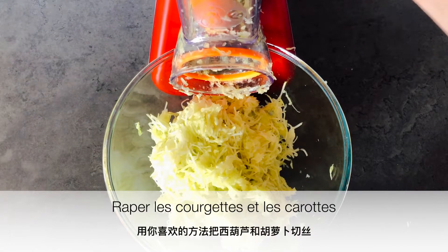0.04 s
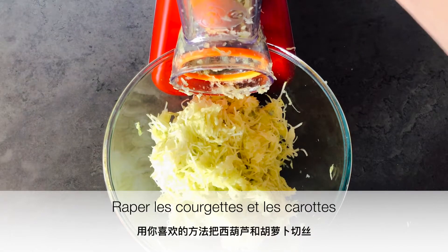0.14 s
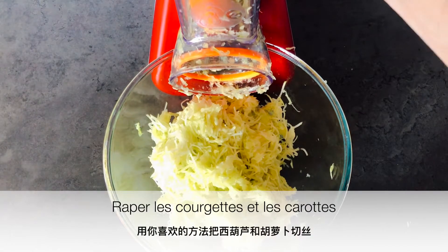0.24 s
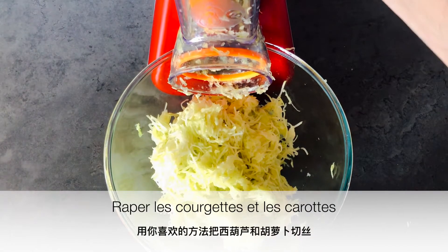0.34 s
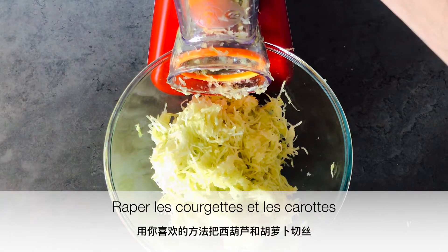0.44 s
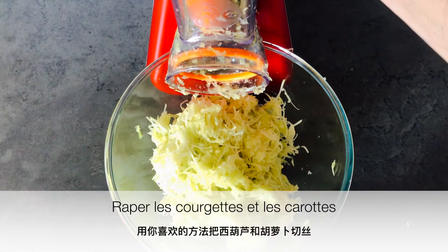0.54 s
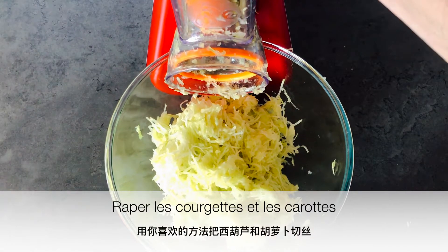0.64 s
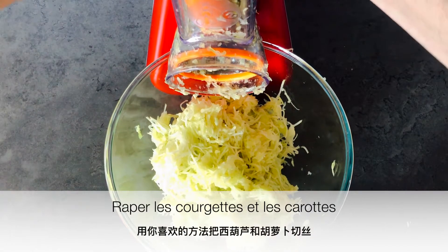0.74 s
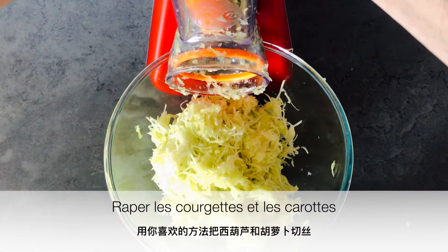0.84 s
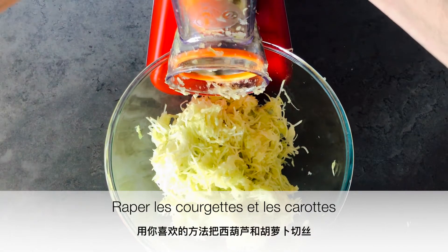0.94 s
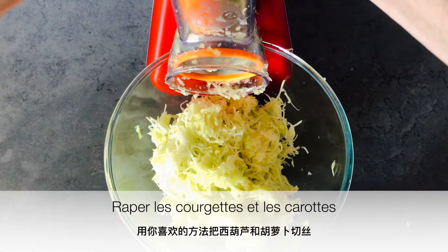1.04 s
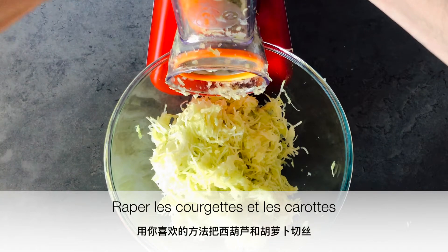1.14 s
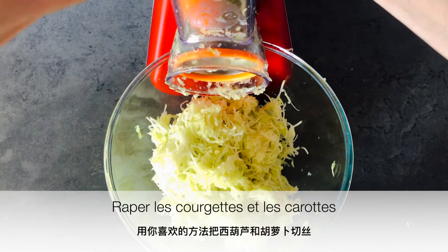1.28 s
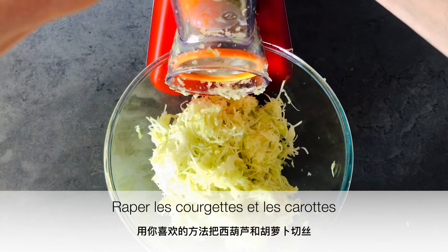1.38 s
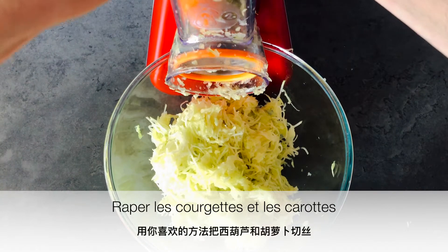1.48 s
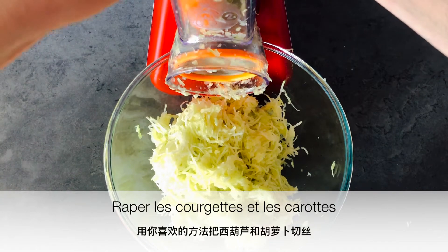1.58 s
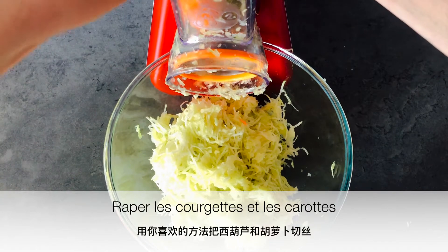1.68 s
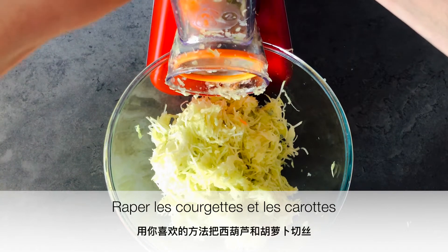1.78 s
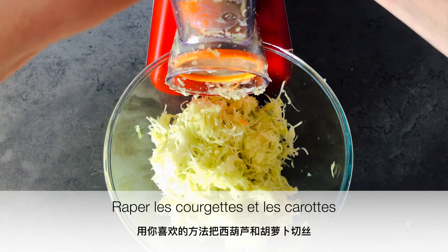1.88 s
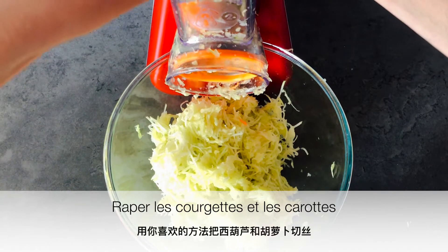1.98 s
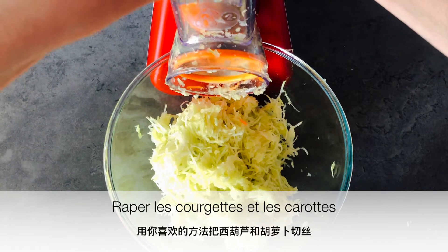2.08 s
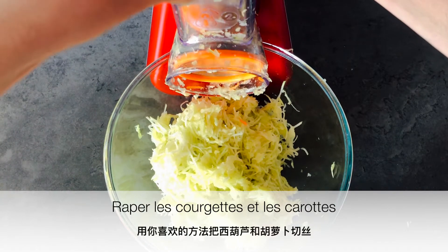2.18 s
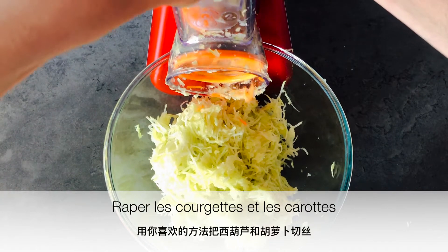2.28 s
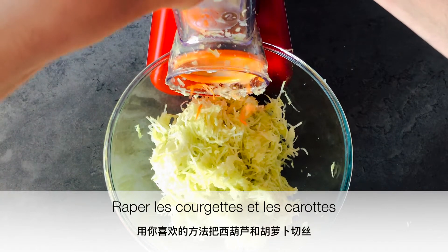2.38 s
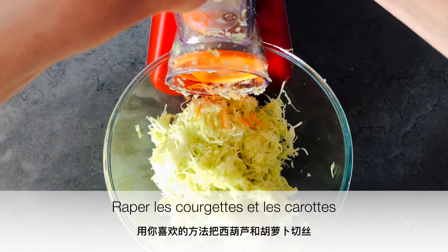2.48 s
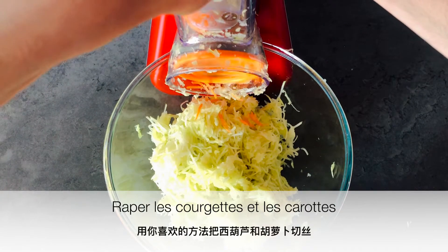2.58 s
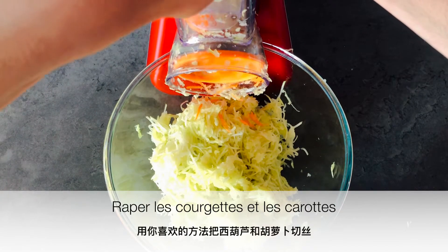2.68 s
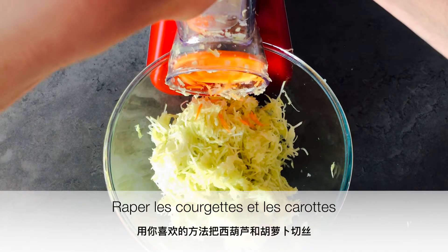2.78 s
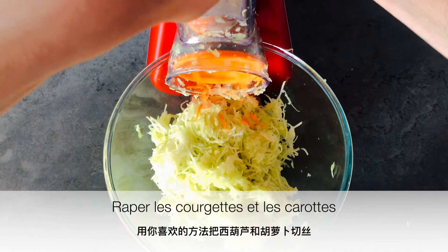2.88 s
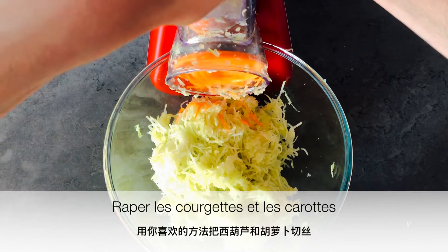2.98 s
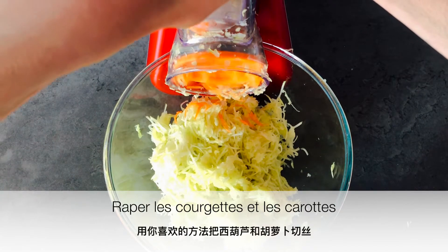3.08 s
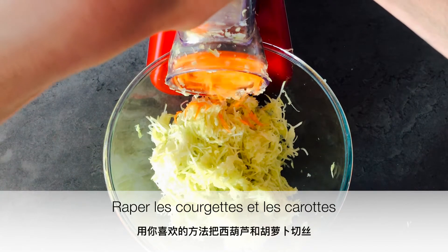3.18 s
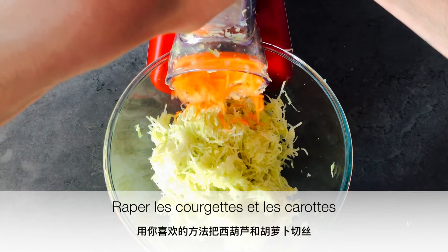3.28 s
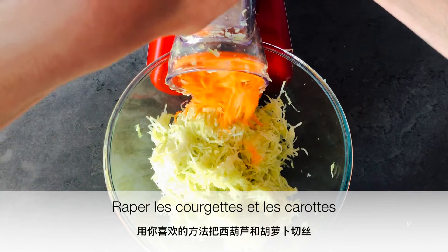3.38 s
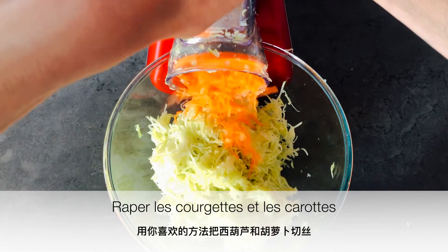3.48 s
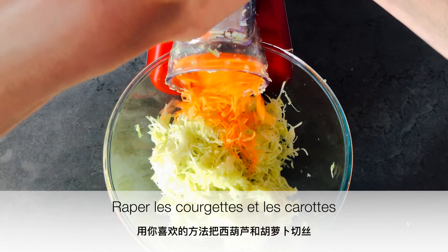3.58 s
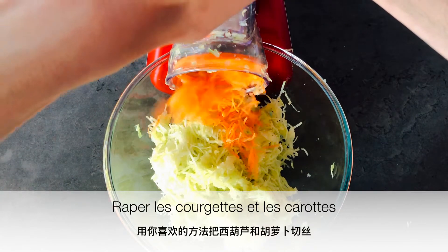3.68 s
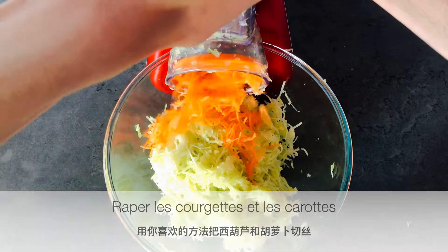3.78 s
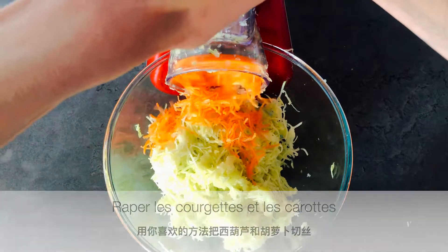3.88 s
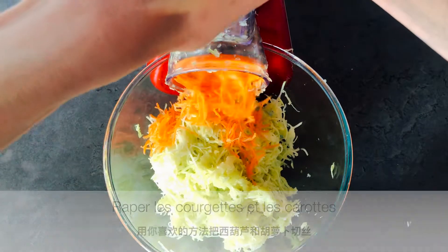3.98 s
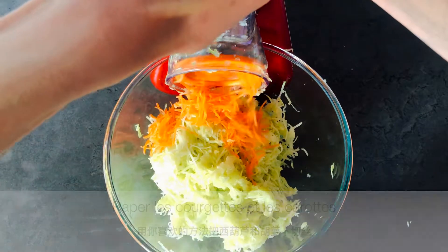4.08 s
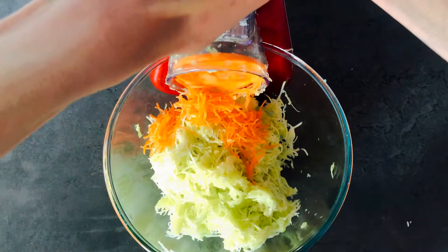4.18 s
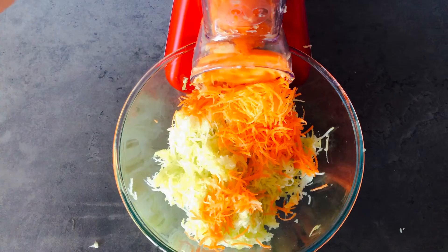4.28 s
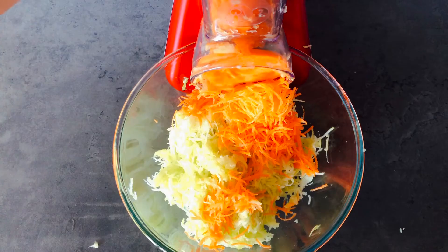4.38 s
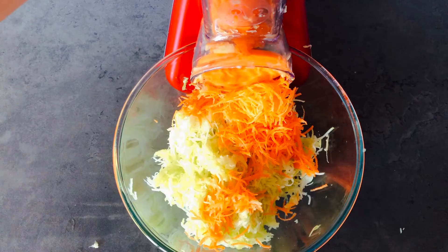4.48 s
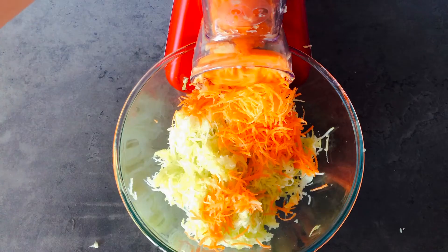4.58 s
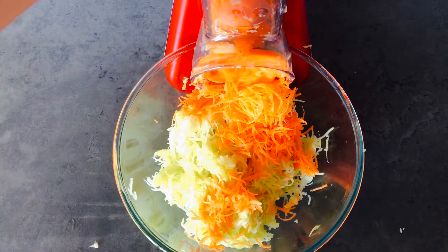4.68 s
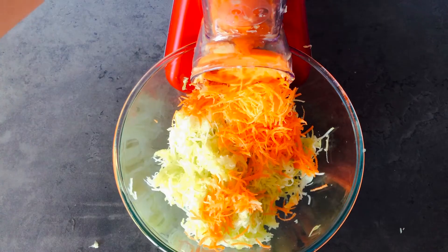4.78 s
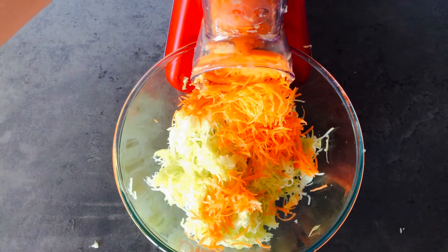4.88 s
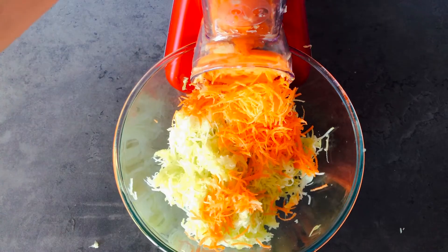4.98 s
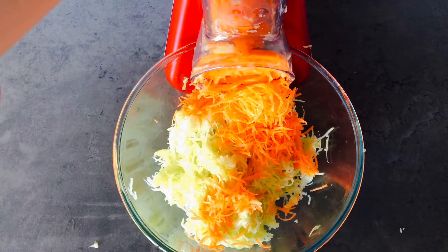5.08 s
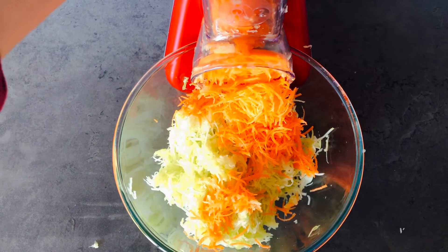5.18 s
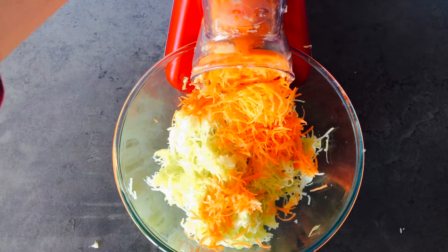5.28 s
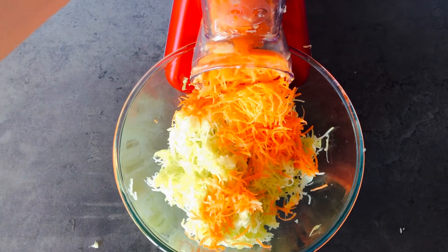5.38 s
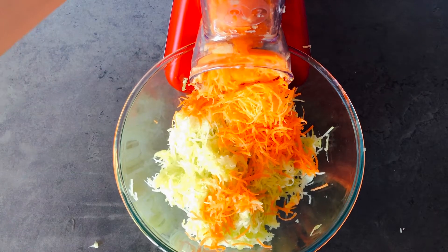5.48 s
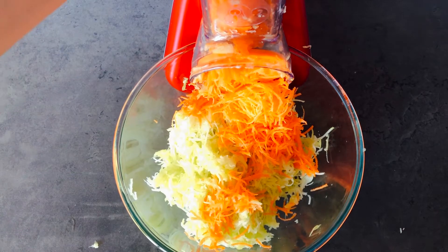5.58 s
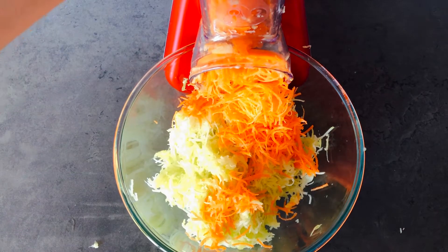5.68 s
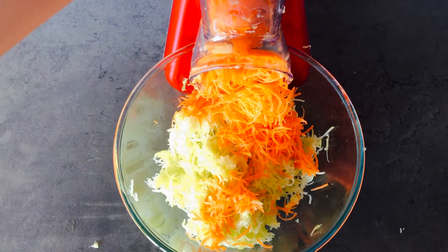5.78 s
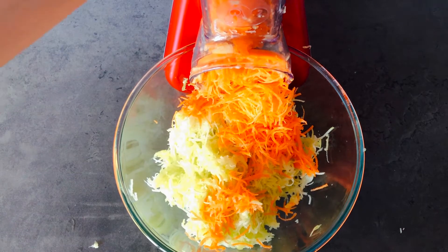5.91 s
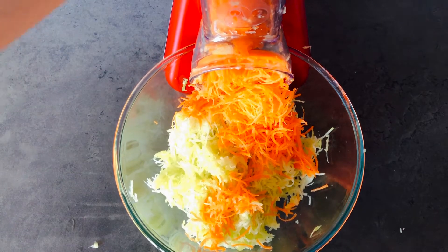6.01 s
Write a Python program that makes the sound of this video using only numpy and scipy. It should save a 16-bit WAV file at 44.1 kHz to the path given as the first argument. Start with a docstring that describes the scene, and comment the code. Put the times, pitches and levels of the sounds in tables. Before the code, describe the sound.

Close in a quiet kitchen, plastic clacks lead to a geared motor's rising whine, a rushing, slightly straining run, and a low winding-down glide.

```python
"""In a quiet kitchen, close by and the same in both channels, hands handle a small geared electric grater.
Knocks on the plastic casing are noise bursts and ringing modes; rubbing fingers are patchy shaped noise.
The motor whines up to speed and sags as it shreds: tones locked to three shafts, over rush, hiss and rumble.
At 4.229 s the powered sound breaks off and a lower, unloaded coast glides to a stop, hum under noise and rasp.
More knocks come during and after the coast; knocks and coast leave a short room echo."""
import sys
import numpy as np
from scipy import signal
from scipy.io import wavfile
from scipy.ndimage import uniform_filter1d

SR = 44100
rng = np.random.default_rng(int(sys.argv[2]) if len(sys.argv) > 2 else 0)


def digitize_waveform(pressure):
    """Quantize a signal to 16-bit integers and store it at the path in sys.argv[1].

    Rows of a 2-D input are taken as channels; values are limited to [-1, 1].
    """
    field = np.atleast_2d(pressure).T
    bounded = np.clip(field, -1, 1)
    quanta = np.round(bounded * 32767).astype(np.int16)
    wavfile.write(sys.argv[1], SR, quanta)


N = 266800

# Room tone spectrum: (frequency [Hz], density [dB per Hz])
ROOM_TONE_SHAPE = [(18, -70), (30, -28), (48, -7.5), (108, -3.5), (124, -8), (188, -3.5), (220, -7.5),
                   (258, -6), (318, -23), (413, -20), (755, -31), (1570, -38.5), (15800, -55.5)]
# Echo decay of the kitchen: (frequency [Hz], t60 [s])
ECHO_DECAY = [(200, 0.2), (600, 0.61), (1400, 0.75), (3700, 0.35), (10000, 0.28)]
# Fingers rubbing the casing, one list per rub: (time [s], level [dB])
RUBS = [
    [(0.35, -95), (0.4, -90), (0.544, -77), (0.834, -90), (0.9, -79)],
    [(5.88, -95), (5.944, -89), (6.05, -77)],
]
# Spectrum of the rubbing: (frequency [Hz], density [dB per Hz])
RUB_SHAPE = [(200, -38), (500, 12), (1500, 0), (4000, -13), (9000, -20), (15000, -40)]
# Knocks: (time [s], tick [dB], hollow thud [dB], clack [dB], thud centre [Hz], thud build-up [s], ring share [1])
KNOCKS = [(0.3541, -51, -41.5, -42, 394, .005, 0.88), (0.377, -44.5, -41.5, -46, 397, .007, 0.86),
          (0.472, -74, -50, -52.5, 706, 0.0042, 0.35), (0.478, -77, -43.5, -63, 665, 0.0025, 0.3),
          (0.537, -58.5, -62, -75, 210, .0021, 0.25), (0.678, -60, -73.5, -78, 202, .0021, 0.3),
          (0.6853, -68, -61, -52.5, 797, 0.0017, 0.05), (0.6956, -73, -45, -77.5, 362, 0.0017, 0.3),
          (0.773, -68, -77, -63, 606, 0.0019, 0.3), (0.783, -56.5, -50.5, -52.5, 355, 0.0016, 0.26),
          (0.8113, -68, -57, -61.5, 285, 0.0028, 0.2), (0.833, -67, -69.5, -69.5, 202, .0021, 0.3),
          (0.866, -83, -49.5, -72, 363, 0.0027, 0.3), (0.8984, -48, -44, -52, 322, .0021, 0.4),
          (0.9566, -40, -57, -38, 245, .0021, 0.2), (5.01, -50, -49, -40.5, 360, .0021, 0.2),
          (5.0172, -63, -42, -49.5, 393, 0.0038, 0.28), (5.401, -67.5, -67, -72.5, 205, 0.0019, 0.3),
          (5.54, -83, -68, -82, 328, .0021, 0.1), (5.6473, -87, -55.5, -91, 231, .0021, 0.3),
          (5.897, -88, -59.5, -63, 202, 0.0018, 0.21), (5.9306, -74, -48.5, -59.5, 266, 0.0031, 0.2),
          (5.9734, -79, -37.5, -51.5, 370, 0.0017, 0.22)]
# Hollow casing modes of the thud: (frequency [Hz], level [dB], t60 [s])
THUD_MODES = [(197, 0.5, 0.046), (271, -7, 0.054), (341, 0, 0.05), (365, -0.5, 0.055), (461, -5.5, 0.042),
              (621, -6.5, 0.045), (677, -2.5, 0.027), (862, -1, 0.017)]
# Short ring inside the clack: (frequency [Hz], level [dB], t60 [s])
RING_MODES = [(1290, -6, 0.035), (1640, -5, 0.038), (2220, -17, .025), (2600, -2, .055), (4050, 1.5, 0.026)]
# Casing resonances that lift noise and tones: (frequency [Hz], width [Hz], lift [dB])
CASING = [(193, 19, 6.5), (348, 16, 5.5), (369.5, 120, 7), (626, 58, 6.5), (720, 23, -2.5), (1216, 170, 5),
          (1534, 58, 4), (1736, 150, 6), (1872, 49, 5.5), (2094, 100, 4), (2237, 38, 3), (2602, 34, 3),
          (3490, 95, 2.5), (3745, 30, 7), (4256, 61, 3), (4740, 210, 5), (4960, 140, 1), (5350, 80, 2.5),
          (5750, 74, -0.5), (6470, 63, 1.5), (7395, 170, 5.5), (7810, 200, -3.5), (8160, 270, 5.5),
          (8900, 250, 3), (9900, 110, 1), (11640, 140, 3.5)]
# Turns per rotor turn: (rotor [1], middle shaft [1], third shaft [1])
SHAFTS = (1, 7 / 18, 7 / 18 * 13 / 40)
# The tone tables add up multiples of the three shaft speeds:
# (rotor multiple [1], middle shaft multiple [1], third shaft multiple [1], level [dB])
ROTOR = [(1, 0, 0, 0)]
ROTOR_TWICE = [(2, 0, 0, -3)]
WEAK_TONES = [(0, 2, 0, -22), (-1, 6, -1, -22), (1, 2, 0, -22), (2, 0, 0, -21), (0, 6, -1, -22),
              (0, 7, -1, -24), (3, 0, 0, -24), (0, 9, 0, -20), (-1, 13, 0, -21), (0, 12, 0, -22),
              (0, 16, 0, -22), (7, 0, 0, -20), (8, 0, 0, -25), (0, 31, 0, -22), (12.5, 0, 0, -19),
              (21, 0, 0, -29)]
# Meshing of the middle shaft's 13 teeth, with side tones from wobbling shafts; then its harmonics
MESH = [(0, 13, 0, -1), (0, 13, 1, -11), (0, 14, 0, -10), (0, 14, 1, -16), (0, 15, 0, -15)]
MESH_TWICE = [(0, 26, 0, -1), (0, 26, 1, -13), (0, 27, 0, -9), (0, 27, 1, -18), (10, 0, 0, -16),
              (0, 25, 0, -17)]
MESH_THRICE = [(0, 39, 0, -2), (0, 38, 0, -4), (0, 40, 0, -5)]
# Rotor hum at each pitch it passes: (rotor speed [Hz], level [dB])
HUM = [(90, -80), (105, -62), (118, -78), (135, -59), (153, -70), (180, -57), (215, -62.5), (255, -66.5),
       (285, -50.5), (315, -56), (345, -48), (377, -38), (394, -48), (411, -46), (423, -50), (440, -46.5),
       (461, -43.5), (476, -38), (486, -41.5), (491, -43.5), (496, -45.5), (560, -66)]
# Rush of gears, air and blade, powered and coasting: (frequency [Hz], density [dB per Hz])
RUSH_SHAPE = [(60, -47), (150, -22), (240, -14.5), (430, -10.5), (540, -17.5), (760, -15), (1300, -16),
              (2300, -11), (2900, -14), (4160, -17), (5030, -17.5), (6500, -19.5), (8450, -60)]
COAST_RUSH_SHAPE = [(24, -65.5), (40, -33), (181, -18.5), (309, -15.5), (382, 3), (561, -13.5), (1160, -6),
                    (2290, -7.5), (2830, -6.5), (5250, -13), (6500, -23.5), (8450, -52), (14300, -120)]
# Hiss, powered (from the brushes) and coasting: (frequency [Hz], density [dB per Hz])
HISS_SHAPE = [(3120, -36.5), (5300, -1.5), (5450, -5), (6000, -11), (6850, -2), (7330, -3), (8260, -3.5),
              (9560, -8.5), (15000, -14), (15800, -19)]
COAST_HISS_SHAPE = [(3120, -32), (5300, -2), (5700, -9), (6750, -9), (7960, -13), (8610, -8), (10400, -19),
                    (12000, -16), (15800, -27)]
# Rumble through the worktop: (frequency [Hz], density [dB per Hz])
RUMBLE_SHAPE = [(40, -45.5), (75, -31), (105, -2), (122, -5), (140, -4), (170, -9), (260, -38)]
# Rasp of the slow gears: (frequency [Hz], density [dB per Hz])
RASP_SHAPE = [(1900, -45), (2230, -16), (2290, 9), (2350, -8), (2900, -27), (3480, -1.5), (3600, 5),
              (3720, -12), (4500, -47)]
# Speed missing at switch-on: (speed [Hz], catch-up time constant [s])
START_LAGS = [(266, .249), (116, .068)]
# Shredding slows the rotor: (time [s], speed lost [Hz])
SAG = [(1.9, 0), (2.2, 3.6), (2.6, 6.6), (3.8, 6.8), (4.06, 10), (4.13, 8.7), (4.2, 3)]
# Gear tones under changing load: (time [s], mesh [dB], second harmonic [dB], third harmonic [dB])
LOAD = [(.9, -78, -75, -80), (1, -59, -60, -58), (1.07, -53, -56.5, -63), (1.14, -69, -60, -63),
        (1.19, -54, -54, -57), (1.3, -53.5, -54, -66), (1.4, -59, -55, -69), (1.6, -54.5, -53.5, -66.5),
        (1.85, -58, -49, -68), (2.25, -51, -55, -65.5), (2.55, -53.5, -53, -69.5),
        (2.85, -51.5, -56, -64.5), (3.05, -50, -50.5, -64.5), (3.2, -51, -54.5, -61),
        (3.45, -49.5, -49, -68.5), (3.7, -50, -48.5, -73), (3.95, -56, -47, -71), (4.08, -61.5, -47.5, -66),
        (4.13, -63, -57.5, -72), (4.229, -51, -55.5, -59.5)]
# The rumble swells: (time [s], rise [dB])
SWELLS = [(1.1, 5), (1.51, 3), (3.51, 6.7), (4.09, 8.2)]

ROOM_TONE_DB = -71.5
EDGE_HZ = 15920  # top of the audible band
KNOCK_T60_S = .025  # noise bursts of tick and clack
POWER_ON_S, BREAK_S = .9, 4.229  # powered sound starts; it stops and the coast begins
FREE_HZ = 497.7  # rotor speed without load
RUSH_DB, HISS_DB, WEAK_TONES_DB = -44.5, -49.5, -47.5  # once up to speed
START_DB, START_S = -15, 0.087  # those three begin this much lower; catch-up time constant
RUMBLE_DB, SWELL_S = -66, .07  # between swells; each swell's rise falls to 1/e this far from its centre
GEAR_WAVER_DB = 1.1
COAST_HZ, BRAKE_HZ_PER_S = 300.5, 243  # friction slows the rotor evenly
CREEP_HZ = 5.3  # the last turns ease out around this speed
COAST_HUM_DB, COAST_SECOND_DB = 0.5, -21  # over the HUM level at that pitch
COAST_RUSH_DB, COAST_RUSH_LOSS_DB = -47.5, 6.06  # at first; lost per halving of speed
COAST_HISS_DB, COAST_HISS_LOSS_DB = -59.5, 6.8
RASP_DB, RASP_HZ, RASP_FALL_DB = -63, 91.6, 4  # peak, at this rotor speed; fall per squared octave away


def amp(db):
    """Decibels to amplitude factor."""
    return 10 ** (np.asarray(db) / 20)


def evened(x):
    """Scale to unit rms."""
    return x / np.sqrt(np.mean(x ** 2) + 1e-20)


def read(points, hz):
    """Read a curve between its points on a log frequency axis."""
    f, value = np.transpose(points)
    return np.interp(np.log(hz + 1), np.log(f + 1), value)


def wander(size, span):
    """Slow random drift of unit rms, smoothed twice over span values."""
    drift = uniform_filter1d(rng.standard_normal(size), span, 0)
    return evened(uniform_filter1d(drift, span, 0))


def slow(size, span):
    """Random drift, one value a sample, smooth over span blocks of 64 samples."""
    blocks = size // 64 + 1
    return np.interp(np.arange(size) / 64, np.arange(blocks), wander(blocks, span=span))


def unroll(rows, span=None):
    """First sample and one value a sample for each column, over the table's own span unless given."""
    s, *columns = np.transpose(rows)
    first, last = (min(round(edge * SR), N) for edge in span or (s[0], s[-1]))
    t = np.arange(first, last) / SR
    return first, [np.interp(t, s, column) for column in columns]


def noise(size, shape_db, patchy_db):
    """Random short-time spectra with drifting patches and a steady room ripple; shape_db maps Hz to dB."""
    frames, hz = size // 512 + 5, np.fft.rfftfreq(2048, 1 / SR)
    real, imaginary, patches = rng.standard_normal((frames, 1025, 3)).T
    patches = uniform_filter1d(patches, 16, 0)  # along frequency
    patches = evened(uniform_filter1d(patches, 5, 1))  # along time
    ripple_db = 1.6 * wander(1025, span=2)
    level_db = (shape_db(hz) + ripple_db)[:, None] + patchy_db * patches
    spectra = (real + 1j * imaginary) * amp(level_db)
    return evened(signal.istft(spectra, nperseg=2048, noverlap=1536)[1][:size])


def room_tone():
    """The quiet kitchen: low, patchy noise with most of its weight in the bass."""
    return amp(ROOM_TONE_DB) * noise(N, lambda f: read(ROOM_TONE_SHAPE, f), 2.5)


def kitchen_echo(x):
    """Echo of sparse taps of random sign, each band dying at its own speed."""
    taps = np.zeros(SR // 2)
    at = np.arange(300, len(taps) - 20, 20)
    taps[at + rng.integers(0, 20, len(at))] = rng.choice([-1., 1.], len(at))
    hz, t, spectra = signal.stft(taps, SR, nperseg=256)
    decay_db = -60 * t / read(ECHO_DECAY, hz)[:, None]
    tail = signal.istft(spectra * amp(decay_db), SR, nperseg=256)[1]
    return signal.fftconvolve(x, tail / np.linalg.norm(tail))[:N]


def rub(rows):
    """Fingers rubbing the casing: strongly patchy friction noise."""
    start, (level_db,) = unroll(rows)
    return start, amp(level_db) * noise(len(level_db), lambda f: read(RUB_SHAPE, f), 3.9)


def ringing(modes, t, rise_s, centre_hz, fall_db):
    """Decaying modes with a soft start, peak 1; modes weaken by fall_db per squared octave from the centre."""
    out = 0
    for hz, db, t60 in modes:
        level_db = db - fall_db * np.log2(hz / centre_hz) ** 2 - 60 * t / t60
        out = out + amp(level_db) * np.sin(2 * np.pi * (hz * t + rng.random()))
    out = out * (1 - np.exp(-t / rise_s)) ** 2
    return out / abs(out).max()


def knocks():
    """Each knock is a bright tick, a dry clack with a short ring, and a hollow thud that builds up."""
    out, t = np.zeros(N + 6000), np.arange(6000) / SR
    tick_band = signal.butter(2, [4500, 12500], "band", fs=SR)
    clack_band = signal.butter(2, [700, 4200], "band", fs=SR)
    envelope = amp(-60 * t / KNOCK_T60_S) * (1 - np.exp(-t / 0.001))
    for s, tick_db, thud_db, clack_db, thud_hz, build_s, ring_share in KNOCKS:
        bursts = rng.standard_normal((2, len(t))) * envelope
        tick = signal.lfilter(*tick_band, bursts[0])
        clack = 2.16 * signal.lfilter(*clack_band, bursts[1])
        clack += ring_share * ringing(RING_MODES, t, 0.00055, 2600, 0)
        thud = ringing(THUD_MODES, t, build_s, thud_hz, 10.0)
        knock = amp(tick_db) * tick + amp(clack_db) * clack + amp(thud_db) * thud
        out[round(s * SR):][:len(t)] += knock
    return out[:N]


def casing_lift(hz):
    """Bell-shaped lift in dB around each casing resonance."""
    return sum(db / (1 + ((hz - f) / (width / 2)) ** 2) for f, width, db in CASING)


def casing_noise(level_db, shape):
    """Noise coloured by the casing resonances, following a level curve."""
    return amp(level_db) * noise(len(level_db), lambda f: read(shape, f) + casing_lift(f), 1.2)


def tones(table, rotor_hz, waver_db, lift, fuzz):
    """Sines locked to the shafts; each wavers, blurs, and follows the casing resonances by the lift factor."""
    size, out = len(rotor_hz), 0
    turns = np.cumsum(rotor_hz) / SR + 0.0078 * slow(size, span=12)  # gear play shakes the timing
    for *multiples, db in table:
        ratio = np.dot(multiples, SHAFTS)
        swell_db = lift * np.repeat(casing_lift(ratio * rotor_hz[::64]), 64)[:size]
        # uneven tooth blows spread the line
        blur = 1 + fuzz * (slow(size, span=3) + 1j * slow(size, span=3))
        level = amp(db + swell_db + waver_db * slow(size, span=12))
        out = out + level * blur * np.exp(2j * np.pi * (ratio * turns + rng.random()))
    return np.sqrt(2) * out.real


def coast():
    """Unloaded, without gear tones: hum, rush and hiss follow the falling speed; a rasp peaks on the way."""
    t = np.arange(round(1.5 * SR)) / SR
    even_hz = COAST_HZ - BRAKE_HZ_PER_S * t
    hz = CREEP_HZ * np.logaddexp(0, even_hz / CREEP_HZ) + 1e-9  # soft landing at zero
    halvings = np.log2(COAST_HZ / hz)
    slowing_db = -12 * np.maximum(np.log2(HUM[0][0] / hz), 0)  # the slowest turns hardly hum
    hum_db = read(HUM, hz) + COAST_HUM_DB + slowing_db
    second_db = read(HUM, 2 * hz) + COAST_SECOND_DB + slowing_db
    out = amp(hum_db) * tones(ROTOR, hz, 0.57, 0, 0.045)
    out += amp(second_db) * tones(ROTOR_TWICE, hz, 2.2, 0, 0.14)
    rattle_db = 0.81 * slow(len(hz), span=4)  # loose gears chatter
    out += casing_noise(COAST_RUSH_DB - COAST_RUSH_LOSS_DB * halvings + rattle_db, COAST_RUSH_SHAPE)
    out += casing_noise(COAST_HISS_DB - COAST_HISS_LOSS_DB * halvings + rattle_db, COAST_HISS_SHAPE)
    rasp_db = RASP_DB - RASP_FALL_DB * np.log2(hz / RASP_HZ) ** 2
    out += amp(rasp_db) * noise(len(hz), lambda f: read(RASP_SHAPE, f), 2.2)
    return round(BREAK_S * SR), out


def motor():
    """Rotor hum, gear tones, broad rush, rumble, and brush hiss that throbs with the mains."""
    start, (once_db, twice_db, thrice_db) = unroll(LOAD, (POWER_ON_S, BREAK_S))
    t = np.arange(len(once_db)) / SR
    missing_hz = sum(lag * np.exp(-t / s) for lag, s in START_LAGS)
    hz = FREE_HZ - missing_hz - np.interp(POWER_ON_S + t, *np.transpose(SAG))
    rise_db = START_DB * np.exp(-t / START_S)
    out = amp(read(HUM, hz)) * tones(ROTOR, hz, 0.75, 0, 0.017)
    out += amp(WEAK_TONES_DB + rise_db) * tones(WEAK_TONES, hz, 4.0, 0.71, 0.18)
    for level_db, table, lift in (once_db, MESH, .8), (twice_db, MESH_TWICE, .9), (thrice_db, MESH_THRICE, .6):
        out += amp(level_db) * tones(table, hz, GEAR_WAVER_DB, lift, 0.14)
    throb = 1 + .12 * np.sin(2 * np.pi * 100 * t)  # twice per 50 Hz mains cycle
    out += casing_noise(RUSH_DB + rise_db, RUSH_SHAPE)
    out += throb * casing_noise(HISS_DB + rise_db, HISS_SHAPE)
    swell_db = sum(db * np.exp(-((POWER_ON_S + t - s) / SWELL_S) ** 2) for s, db in SWELLS)
    rumble = noise(len(hz), lambda f: read(RUMBLE_SHAPE, f), 0.81)
    return start, out + amp(RUMBLE_DB + swell_db) * rumble


def scene():
    """Room tone, knocks and coast with their echo, rubbing and the powered motor, the same in both channels."""
    hands, slowing = knocks(), np.zeros(N)
    start, sound = coast()
    slowing[start:start + len(sound)] = sound
    echo = kitchen_echo(amp(-12.0) * hands + amp(-14.5) * slowing)
    mix = room_tone() + hands + slowing + echo
    for start, sound in [rub(rows) for rows in RUBS] + [motor()]:
        mix[start:start + len(sound)] += sound
    return np.array([mix, mix])


def record(dry):
    """The microphone drops the deepest bass; a steep low-pass then limits the band."""
    bass_cut = signal.butter(4, 48, "high", fs=SR, output="sos")
    dry = signal.sosfilt(bass_cut, dry)
    low_pass = signal.firwin(511, EDGE_HZ, window=("kaiser", 9), fs=SR)
    return signal.oaconvolve(dry, low_pass[None], "same")


dry = scene()
out = record(dry)
digitize_waveform(out)
```